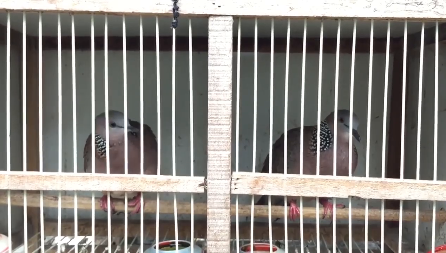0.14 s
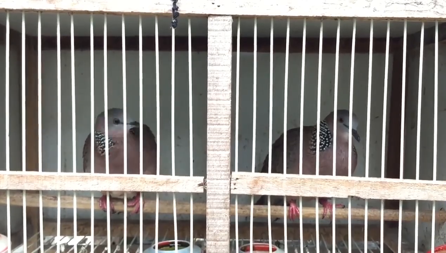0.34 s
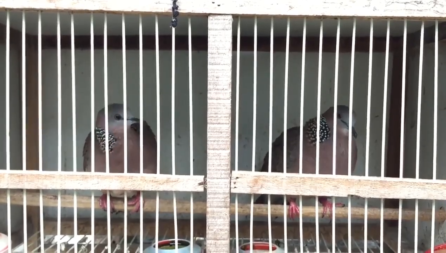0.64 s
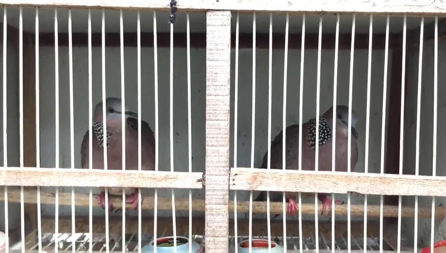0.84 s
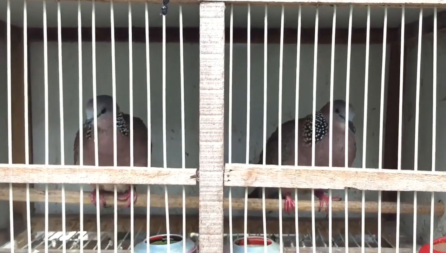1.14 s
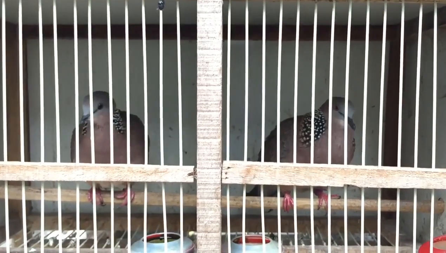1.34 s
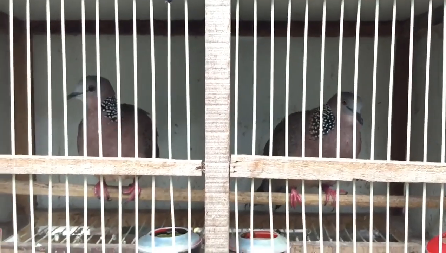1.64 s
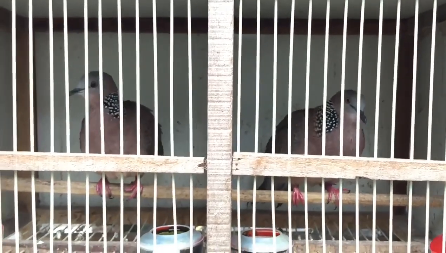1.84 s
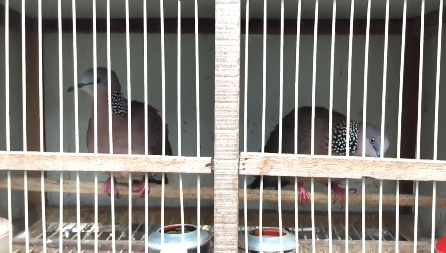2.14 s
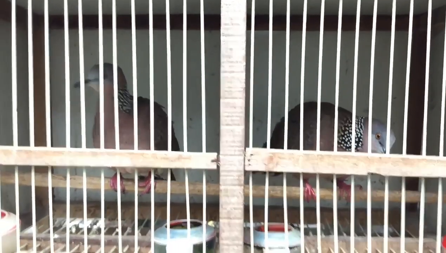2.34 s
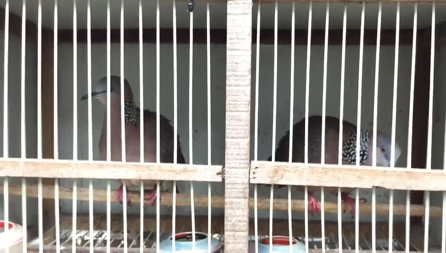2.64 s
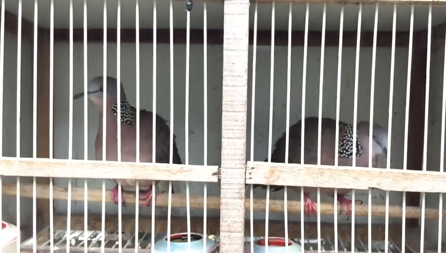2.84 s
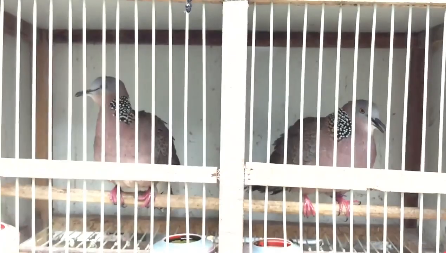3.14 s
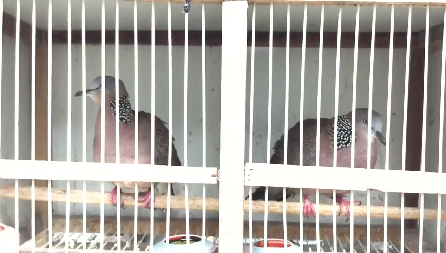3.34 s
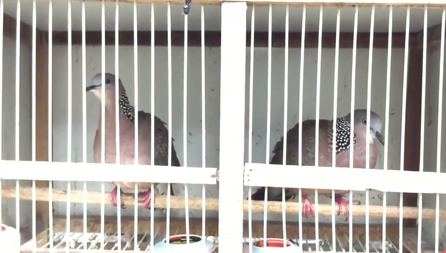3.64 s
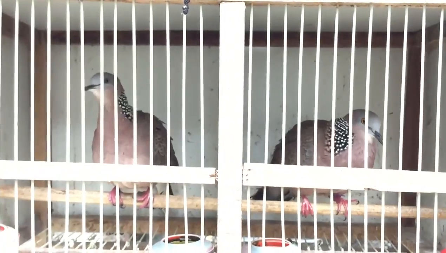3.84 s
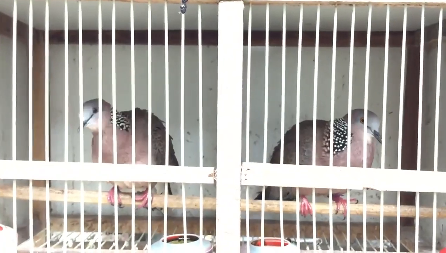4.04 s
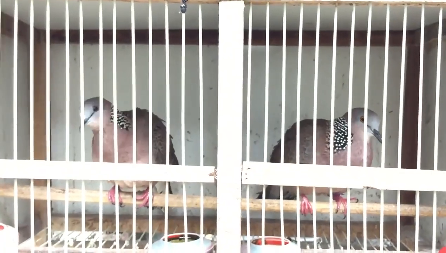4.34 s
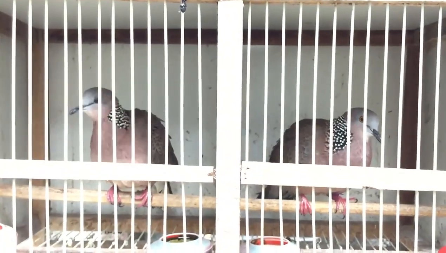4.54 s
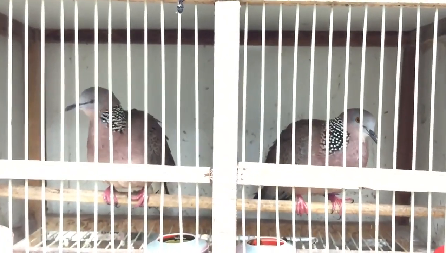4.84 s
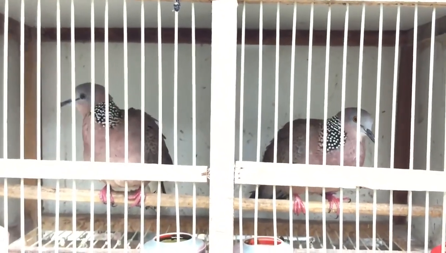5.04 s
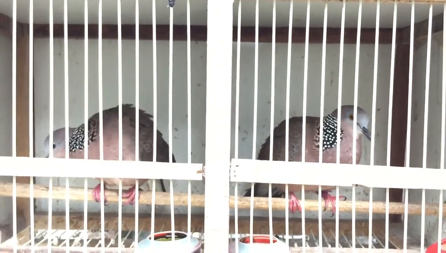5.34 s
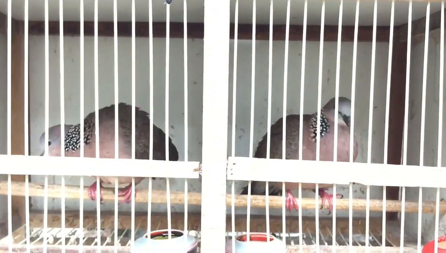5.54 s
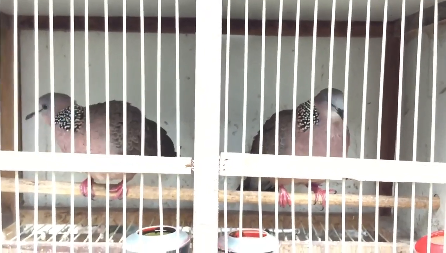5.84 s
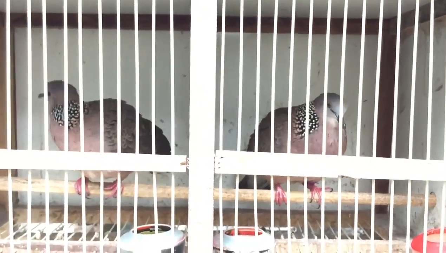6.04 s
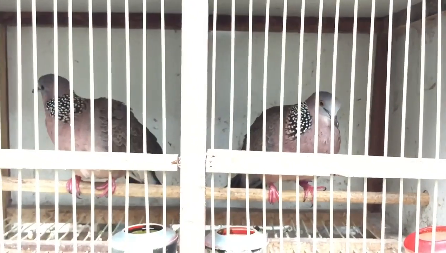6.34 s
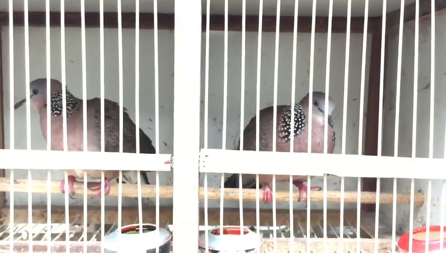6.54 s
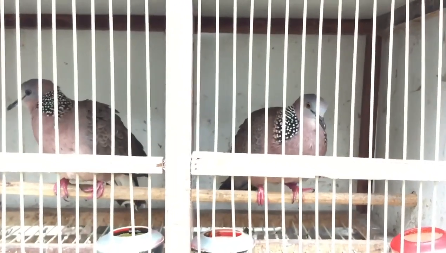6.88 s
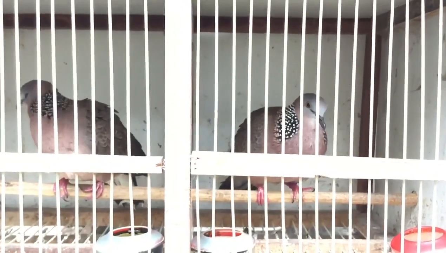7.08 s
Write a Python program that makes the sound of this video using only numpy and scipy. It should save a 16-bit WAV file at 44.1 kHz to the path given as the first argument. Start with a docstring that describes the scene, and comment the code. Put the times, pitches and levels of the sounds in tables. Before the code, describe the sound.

Caged doves coo over one another: one clear and near, repeating hoot-hoot-purr, others fluttery and echoing, with faint claw ticks and distant traffic.

```python
"""A near spotted dove repeats two short hoots and a long purr: near-pure arched tones, chopped by its syrinx.
Neighbours in wooden cages coo more roughly around it, and a low-voiced dove draws its coos out and grunts.
Claws tick and knock on the perches as impulses and ringing modes; feathers rustle as coloured noise.
Far off are traffic, hiss and a whine of shaped noise, a motorbike of exhaust pulses, hoarse squawks,
whistles, chips and held notes. Decaying noise stands for the reflections of the yard."""
import sys
import numpy as np
from scipy import signal
from scipy.fft import rfft, irfft, next_fast_len
from scipy.io import wavfile
from scipy.ndimage import map_coordinates

SR = 44100
rng = np.random.default_rng(int(sys.argv[2]) if len(sys.argv) > 2 else 0)


def waveform_to_disk(signal):
    """Save audio, clipped to [-1, 1], as 16-bit WAV at the path in sys.argv[1]."""
    frames = np.transpose(np.atleast_2d(signal))
    scaled = np.clip(frames, -1, 1) * 32767
    samples = np.round(scaled).astype(np.int16)
    wavfile.write(sys.argv[1], SR, samples)


N = 317961
TIME = np.arange(N) / SR

# Relative spectra of traffic, far hiss, far whine, feathers and still air. Each row: frequency in Hz, level in dB.
TRAFFIC_SPECTRUM = [(38, -13), (52, -8), (70, 3), (105, -0.5), (130, -7), (170, -13), (260, -17),
                    (420, -15)]
HISS_SPECTRUM = [(590, -34.5), (1000, -1), (1370, -8.5), (1510, -10.5), (1630, -8), (2480, -12.5),
                 (5000, -25.5), (6500, -58.5), (11000, -120)]
WHINE_SPECTRUM = [(1150, -14.5), (1330, -2.5), (1410, -1), (1520, -3), (1650, -9), (1830, -1.5),
                  (2250, -8.5), (2550, -18), (3200, -30)]
FEATHER_SPECTRUM = [(1760, -26.5), (3000, -9.5), (3240, -4.5), (3870, -4.5), (4290, -7), (4960, -5.5),
                    (5500, 1.5), (7050, -6), (9160, -3.5), (10400, -7.5), (13100, -5), (15600, -24.5)]
AIR_SPECTRUM = [(200, -9.5), (450, -19), (1000, 6.5), (2000, -16), (4000, -26), (6000, -29), (9000, -23.5),
                (15500, -27)]
# Swells of traffic rumble, gusts of far hiss, rustles of feathers. Each row: start in seconds, length in seconds,
# level in dB.
RUMBLES = [(-.1, 0.29, -40), (1.2, 3.06, -43.5), (5.1, 0.35, -47), (6.92, 0.2, -38.5)]
HISS_GUSTS = [(.135, 0.12, -60), (.31, 0.19, -66)]
RUSTLES = [(.2, 0.42, -61.5), (.58, 0.17, -60), (.72, 0.097, -56.5), (1.04, 0.098, -66),
           (1.27, 0.072, -59.5), (1.56, 0.086, -66), (1.88, 0.11, -58), (2.73, 0.13, -59.5),
           (3.87, 0.12, -56.5), (4.02, 0.06, -62), (4.39, 0.085, -54.5), (4.5, 0.38, -62), (5.22, .11, -57),
           (5.43, 0.39, -61), (6.03, 0.062, -59), (6.24, 0.13, -59.5), (6.61, 0.24, -55), (7.1, 0.36, -58)]
# Far sounds that swell and fade. Each: loudest moment in seconds, level there in dB, rise in dB per second,
# fall in dB per second.
BIKE_PASS = (0.45, -39, 23, 16)
HISS_PASS = (0.33, -51, 13, 18.5)
WHINE_PASS = (7, -45.5, 24, 61)
BIKE_TOP_HZ, BIKE_IDLE_HZ, BIKE_REV_HZ_PER_S = 36.23, 30.43, 9  # firing rate, highest when it is loudest

# Whistles of small birds, held notes of a far animal, squawks of a far bird. Each row: start in seconds,
# length in seconds, first, middle and last pitch in Hz, level in dB.
WHISTLES = [(.078, 0.013, 5360, 5540, 5700, -54), (.35, 0.045, 5650, 5530, 5340, -57),
            (1.92, 0.06, 3880, 3840, 3950, -66.5), (2.65, 0.064, 3500, 3640, 3470, -64.5),
            (3.06, 0.18, 3310, 3750, 4130, -75.5), (3.34, 0.089, 4070, 4130, 4130, -76),
            (5.86, 0.032, 5420, 5450, 5430, -64.5)]
FAR_NOTES = [(-.04, 0.24, 1500, 1476, 1440, -57), (-.04, 0.81, 1235, 1245, 1205, -64),
             (6.85, 0.14, 1373, 1423, 1380, -52), (7.12, 0.11, 1370, 1418, 1376, -48.5)]
SQUAWKS = [(4.76, 0.18, 688, 665, 678, -53.5), (4.954, 0.16, 623.4, 672.6, 634.5, -53),
           (5.115, 0.149, 619, 631.4, 611, -58.5)]
# Relative spectrum of the squawks. Each row: frequency in Hz, level in dB.
SQUAWK_SPECTRUM = [(600, -31), (1300, 2.5), (1700, -7), (2000, -6), (2550, 4), (3300, 1), (4050, 0.5),
                   (4700, -13), (9000, -23)]
SQUAWK_RASP_DB = -9  # hoarse noise in each squawk
# Hoarse chips of small birds. Each row: start in seconds, length in seconds, centre in Hz, level in dB.
CHIPS = [(1.864, 0.074, 4820, -57.5), (3.895, 0.046, 5400, -59), (4.012, 0.053, 6770, -56),
         (6.252, 0.07, 5650, -59)]

# Claw and beak ticks. Each row: start in seconds, relative level in dB, relative weight below 4000 Hz in dB.
TICKS = [(0.15, -47, -3), (1.577, -52, 13), (2.6253, -45.5, -19), (3.501, -43, -19), (4.031, -47, -60),
         (4.8702, -35.5, 53)]
# Relative spectrum of a tick before that weight. Each row: frequency in Hz, level in dB.
TICK_SPECTRUM = [(1000, -25), (2500, 4), (4200, -3), (5600, 3.5), (7200, 1.5), (10000, -2.5), (15000, -7)]
# Feet landing on the perch. Each row: start in seconds, relative level in dB, hardness in dB (upper modes, scrape).
KNOCKS = [(2.4199, -31.5, 4.5), (2.727, -33.5, -19.5), (2.761, -36.5, -19.5), (3.312, -46.5, 6)]
# Modes of the wooden perch. Each row: frequency in Hz, relative level in dB, time to decay by 60 dB in seconds.
PERCH_MODES = [(193, 1, 0.061), (244, 7, 0.037), (300, 3.5, 0.039), (1310, 14.5, 0.0048),
               (1565, -17.5, 0.12), (1820, -17.5, 0.1), (2940, -17, 0.031)]

# Coos of the neighbours. Each row: start in seconds, length in seconds, pitch after the opening climb and
# last pitch in Hz, level in dB, flutter depth (limited to 1).
NEIGHBOUR_COOS = [ (-.05, 0.44, 623.2, 600.8, -30, .5), (0.223, .14, 683, 640, -32, 0.5),
                  (.469, 0.24, 640.4, 616.5, -25.5, .8), (0.745, .28, 657.3, 640, -31.5, .8),
                  (1.441, 0.21, 722.6, 690, -25, 0.8), (1.695, 0.32, 740.4, 690, -24, .9),
                  (2.024, 0.055, 681.7, 642, -18, 0.4), (2.089, 0.089, 634, 579, -26, .7),
                  (2.09, 0.15, 790, 761, -38.5, 0.7), (2.364, 0.41, 895, 844, -33.5, 1),
                  (2.624, 0.1, 690, 681, -31.5, 0.8), (2.787, 0.26, 692, 646, -31, 1.2),
                  (3.056, .11, 675, 597, -26, 0.15), (3.138, 0.13, 561.4, 585, -29, .7),
                  (3.196, 0.12, 735, 740, -28, 0.9), (3.344, 0.24, 630, 605.4, -32, 0.5),
                  (3.651, 0.44, 622, 557.4, -34.5, 0.5), (4.027, .17, 680, 676.5, -26.5, .6),
                  (4.201, 0.13, 646, 558.6, -28.5, .45), (4.353, 0.19, 647, 639, -49.5, 0.37),
                  (4.544, 0.2, 633, 596, -39, .25), (4.716, 0.12, 690, 642, -26.5, 1.1),
                  (4.948, 0.41, 690, 661, -30.5, .7), (5.297, 0.091, 799.4, 768, -30.5, .9),
                  (5.395, 0.3, 700.4, 702, -30.5, 1), (5.506, 0.31, 840, 838.5, -33, 0.7),
                  (5.625, 0.056, 737.5, 703, -19, 0.5), (5.778, 0.21, 674.2, 660.5, -24, 0.7),
                  (5.989, 0.25, 700.7, 658.3, -27, .45), (6.496, 0.2, 684.4, 649.6, -32, .8),
                  (6.76, .17, 628, 584.4, -29, 0.7), (6.934, 0.32, 650, 618, -40.5, 0.3)]
# The higher a neighbour's coo, the faster it flutters.
FLUTTER_AT_HZ, NEIGHBOUR_FLUTTER_HZ, FLUTTER_POWER = 690, 63.51, 2.0

# Coos of the low-voiced dove. Each row: start in seconds, length in seconds, level in dB.
LOW_COOS = [(-.1, 0.85, -33.5), (2.227, 0.75, -29.5), (4.921, .9, -29.5)]
# Grunts between and after those coos. Each row: start in seconds, length in seconds, first pitch in Hz,
# level in dB.
GRUNTS = [(1.43, 0.094, 500.7, -38), (4.2, 0.064, 507, -35.5), (4.5, 0.11, 550.4, -33),
          (6.74, 0.054, 490, -38), (6.87, 0.16, 543, -37.5)]
LOW_ARCH_HZ, LOW_TOP_PLACE = (548, 594, 536), .48  # first, top and last pitch; share of the coo at the top
LOW_FLUTTER, LOW_CLEAN_PLACE = .72, .55  # depth at first; the flutter fades around this share of the coo
# Before and after each coo the voice breaks into a lower register; levels relative to the coo.
LOW_REGISTER_HZ, LEAD_IN_S, LEAD_IN_DB = 494.3, 0.24, -5.5
DROP_S, DROP_DB, DROP_SAG_HZ_PER_S, DROP_FADE_DB_PER_S = 0.11, -0.5, 250, 92

# Phrases of the near dove. Each row: start in seconds, second hoot's length in seconds, delay of the purr in
# seconds, its length in seconds, its top pitch in Hz, place of that top (0-1), nominal flutter rate in Hz,
# fluttering share of each note (0-1).
PHRASES = [(.678, .104, .333, .454, 797, .35, 77, .7), (3.282, .096, .305, .468, 808, .28, 84, .64),
           (5.905, .086, .310, .464, 800, .36, 79, .67)]
# Resonances of throat and beak that light up overtones. Each row: multiple of the pitch, resonance in Hz,
# width in Hz, level in dB.
OVERTONES = [(2, 1330, 280, -54), (3, 2080, 260, -70), (4, 2980, 300, -70), (8, 6230, 480, -67),
             (12, 9100, 550, -73)]
# Relative passband of the inflated throat. Each row: frequency in Hz, level in dB.
THROAT_PASSBAND = [(330, -22), (430, -4), (520, 0), (830, 0), (920, -5), (1050, -12), (1250, -4), (1420, 1),
                   (1600, -6), (2100, 0), (12000, 0)]
# Both hoots arch up from one pitch, the second one higher and later in the note.
FIRST_HOOT_S, HOOT_SPACING_S, HOOT_FLUTTER = .081, .146, .1
HOOT_START_HZ, HOOT_TOPS_HZ, HOOT_TOP_PLACES = 545, (748, 793), (.45, .56)
PURR_START_HZ, PURR_FLUTTER, END_HZ = 765, .92, 605  # each arch of the near dove sinks to END_HZ
NEAR_DB, TIRING_DB_PER_S, NEAR_ATTACK_S = -14.5, 2, .015
SCOOP_HZ, SCOOP_S = 120, .017  # the purr slides up into its pitch and curls down at the end
FLUTTER_LAG, FLUTTER_SETTLE_S = .2, .07  # the flutter starts slower by this share of its nominal rate
OVERTONE_WAVER_DB = 3.5
FLUTTER_TUG_RAD = .15  # at full depth, how far each closure of the valve tugs the phase
SLIP_SHARE = .75  # share of closures that cost a cycle in a deep flutter

# Reflections from cages and walls.
NEAR_WET_DB, NEAR_T60_S, FAR_WET_DB, FAR_T60_S = -11, 0.47, -2, 0.66
LOW_WET_DB = -6.5
TOP_HZ = 15550


def undb(db):
    """A level in decibels is the logarithm of an amplitude gain."""
    return 10 ** (np.asarray(db) / 20)


def unit(x):
    """Normalisation by the effective value gives rms 1."""
    return x / np.sqrt(np.mean(x ** 2))


def ramp(x):
    """A squared sine steps smoothly from 0 to 1."""
    return np.sin(np.pi / 2 * np.clip(x, 0, 1)) ** 2


def drift(rate, size):
    """Spline-interpolated random values, `rate` a second, make a smooth fluctuation with spread near 1."""
    coarse = np.arange(0, size + 32, 32)
    values = map_coordinates(rng.standard_normal(2048), [coarse * rate / SR], order=3, mode="wrap")
    return np.interp(np.arange(size), coarse, values)


def colour(x, points):
    """Linear filtering multiplies the spectrum by a (Hz, dB) curve that falls away beyond its ends."""
    hz, db = np.transpose(points)
    size = next_fast_len(len(x))
    f = np.maximum(np.arange(size // 2 + 1) * SR / size, 1)
    ends = 1 / np.sqrt((1 + (hz[0] / f / 1.2) ** 8) * (1 + (f / hz[-1] / 1.2) ** 8))
    gain = undb(np.interp(np.log(f), np.log(hz), db))
    return irfft(rfft(x, size) * ends * gain, size)[:len(x)]


def add(out, start, x):
    """Superposition: sounds add sample by sample from a start in seconds."""
    i = int(start * SR)
    x, i = x[max(-i, 0):], max(i, 0)
    out[i:i + len(x)] += x[:N - i]


def yard(x, wet_db, t60):
    """Reverberation: direct sound plus exponentially decaying noise for reflections from cages and walls."""
    t = np.arange(SR // 2) / SR
    tail = rng.standard_normal(len(t)) * np.exp(-np.log(1000) * t / t60) * ramp(t / 0.0028)
    tail = tail / np.linalg.norm(tail)
    return x + undb(wet_db) * signal.fftconvolve(x, tail)[:N]


def passing(peak_s, db, rise_db_per_s, fall_db_per_s):
    """The level of a far sound grows linearly in dB to a peak and falls again."""
    return undb(db - np.maximum(rise_db_per_s * (peak_s - TIME), fall_db_per_s * (TIME - peak_s)))


def bursts(rows, attack_share):
    """An envelope of bursts: each rises for a share of its length and ebbs for the rest."""
    share = np.clip(attack_share, .05, .95)
    gain = np.zeros(N)
    for start, length, db in rows:
        rise = ramp((TIME - start) / length / share)
        ebb = ramp((start + length - TIME) / length / (1 - share))
        gain += undb(db) * rise * ebb
    return gain


def patchy(x, patchy_db, rate, count):
    """Independent modulation: `count` frequency bands of a sound flicker each on its own."""
    size = next_fast_len(N)
    spectrum, edges = rfft(x, size), np.geomspace(900, 16000, count + 1)
    band = np.digitize(np.arange(len(spectrum)) * SR / size, edges[1:-1])
    total = np.zeros(N)
    for k in range(count):
        total += irfft(spectrum * (band == k), size)[:N] * undb(patchy_db * drift(rate, N))
    return unit(total)


def wash(spectrum, flicker_db, flicker_rate):
    """Filtered random noise of wavering level, normalised to rms 1."""
    return unit(colour(rng.standard_normal(N), spectrum) * undb(flicker_db * drift(flicker_rate, N)))


def still_air(air_db=-61):
    """Steady broadband noise forms the background of still air."""
    return wash(AIR_SPECTRUM, 1.0, 51) * undb(air_db)


def traffic(traffic_db=-45):
    """Low-frequency noise rumbles on; its swells add to the floor in power."""
    return wash(TRAFFIC_SPECTRUM, 1.4, 9) * np.hypot(undb(traffic_db), bursts(RUMBLES, attack_share=.3))


def far_hiss(hiss_db=-65):
    """Noise flickering band by band hisses far off, with a swell and gusts over a floor."""
    hiss = patchy(wash(HISS_SPECTRUM, 2.2, 12), patchy_db=4, rate=10, count=60)
    swells = passing(*HISS_PASS) + bursts(HISS_GUSTS, attack_share=.25)
    return hiss * np.hypot(undb(hiss_db), swells)


def far_whine():
    """Noise concentrated in a midrange band is heard as a hoarse whine."""
    return patchy(wash(WHINE_SPECTRUM, 0.9, 18), patchy_db=3.5, rate=22, count=60) * passing(*WHINE_PASS)


def feathers(stir_db=-69):
    """Friction noise: feathers stir faintly throughout and rustle in bursts."""
    friction = patchy(wash(FEATHER_SPECTRUM, 2.0, 190), patchy_db=1.5, rate=17, count=30)
    return friction * np.hypot(undb(stir_db + 3.5 * drift(11, N)), bursts(RUSTLES, attack_share=.25))


def motorbike(scatter_db=3.0):
    """A train of exhaust pulses, smeared by reflections, keeps only its low harmonics."""
    hz = np.maximum(BIKE_TOP_HZ - BIKE_REV_HZ_PER_S * np.abs(TIME - BIKE_PASS[0]), BIKE_IDLE_HZ)
    pulses = np.diff(np.floor(np.cumsum(hz) / SR), prepend=0) * undb(scatter_db * drift(42, N))
    smeared = yard(pulses, wet_db=15, t60=.6)
    low = colour(smeared, [(100, -15.5), (165, 1.5), (240, -8.5), (350, -7.0), (450, -18.0)])
    return unit(low) * passing(*BIKE_PASS)


def far_birds(notes, timbre, rough, count, waver_db):
    """Harmonic synthesis: `count` harmonics follow a parabolic pitch with random unsteadiness."""
    out = np.zeros(N)
    for start, length, first, middle, last, db in notes:
        u = np.linspace(0, 1, int(length * SR))
        hz = np.polyval(np.polyfit([0, .5, 1], [first, middle, last], 2), u)
        phase = 2 * np.pi * np.cumsum(hz * (1 + rough * drift(250, len(u)))) / SR
        harmonics = sum(np.sin(k * phase) for k in range(1, count + 1))
        envelope = undb(db + waver_db * drift(62, len(u))) * ramp(4 * u) * ramp(4 * (1 - u))
        add(out, start, unit(colour(harmonics, timbre)) * envelope)
    return out


def squawks():
    """Hoarseness: harmonics that flicker band by band sound over noise of the same spectrum."""
    voice = far_birds(SQUAWKS, SQUAWK_SPECTRUM, rough=.012, count=8, waver_db=2.5)
    rows = [(start, length, db) for start, length, *_, db in SQUAWKS]
    rasp = wash(SQUAWK_SPECTRUM, 2, 40) * bursts(rows, attack_share=0.22)
    broken = np.std(voice) * patchy(voice, patchy_db=3, rate=18, count=14)
    return broken + undb(SQUAWK_RASP_DB) * rasp


def chips():
    """Narrow-band noise has no definite tone: each chip of a small bird is a short band of hiss."""
    out = np.zeros(N)
    for start, length, hz, db in CHIPS:
        band = wash([(.8 * hz, -22), (hz, 0), (1.4 * hz, -20)], 3, 150)
        out += band * bursts([(start, length, db)], attack_share=.3)
    return out


def ticks(decay_s=0.01, gain_db=-3, body=0.24):
    """Impact: claws and beaks excite broadband cracks that decay exponentially, some with more body."""
    out, t = np.zeros(N), np.arange(4096) / SR
    for start, db, middle_db in TICKS:
        spectrum = [(hz, d + body * middle_db * (hz < 4000)) for hz, d in TICK_SPECTRUM]
        crack = unit(colour(rng.standard_normal(len(t)), spectrum))
        add(out, start, crack * np.exp(-t / decay_s) * undb(db + gain_db))
    return out


def knocks(scrape_db=-24, scrape_s=0.072):
    """Modal ringing: feet strike the perch; hardness sets its modes above 1000 Hz and a scrape."""
    out, t = np.zeros(N), np.arange(16384) / SR
    for start, db, hard_db in KNOCKS:
        ring = np.zeros(len(t))
        for hz, d, t60 in PERCH_MODES:
            ring += undb(d + hard_db * (hz > 1000) - 60 * t / t60) * np.sin(2 * np.pi * hz * t)
        scrape = unit(colour(rng.standard_normal(len(t)), HISS_SPECTRUM))
        scrape = scrape * np.exp(-t / scrape_s) * undb(scrape_db + hard_db)
        add(out, start, undb(db) * (ring + scrape) * ramp(t / 0.00061))
    return out


def arch(u, first, turn, last, place):
    """Pitch follows pressure: over a note (u 0-1) it climbs to the turn, then bends to the last pitch."""
    place = np.clip(place, .05, .95)
    climb = (first - turn) * np.maximum(1 - u / place, 0) ** 1.9
    bend = (last - turn) * np.maximum((u - place) / (1 - place), 0) ** 2.3
    return turn + climb + bend


def syrinx(hz, flutter_hz, depth, uneven, scatter):
    """Modulation by a fluttering valve: closures chop a tone and tug its phase; firm ones may cost a cycle."""
    size = len(hz)
    cycle = np.cumsum(flutter_hz * (1 + uneven * drift(70, size))) / SR
    closure = np.cos(np.pi * cycle) ** 2
    shut = np.clip(depth * (1 + .2 * drift(70, size)), 0, 1) * closure ** 1.8
    # one random number per closure decides whether it is firm
    chance = rng.random(256)[np.round(cycle).astype(int) % 256]
    firm = chance < SLIP_SHARE * ramp((depth - .35) / .35)
    # closure ** 3 averages 5/16, so a firm closure slips one whole cycle
    slip = 2 * np.pi * np.cumsum(firm * closure ** 3 * np.gradient(cycle)) * 16 / 5
    phase = 2 * np.pi * np.cumsum(hz) / SR
    tug = FLUTTER_TUG_RAD * depth * np.sin(2 * np.pi * cycle)
    wander = scatter * depth ** 2 * drift(1.4 * np.mean(flutter_hz), size)
    tone = np.sin(phase + tug - slip + wander)
    # the membranes also rasp irregularly a little below the pitch
    rasp = .2 * depth * drift(190, size) * np.sin(.91 * phase)
    return np.sqrt(2) * ((1 - shut) * (1 + .13 * depth * drift(70, size)) * tone + rasp)


def swell(t, hz, attack_s, release_s, fade_db):
    """Loudness follows pitch: the note has soft ends and is weaker where it is low."""
    return ramp(t / attack_s) * ramp((t[-1] - t) / release_s) * undb(-fade_db * (1 - hz / hz.max()))


def neighbours(first=0.94, place=0.21, fade_db=10):
    """Uneven valve modulation makes rougher coos in the other cages, each with a soft release."""
    out, tail_s = np.zeros(N), .025
    for start, length, turn, last, db, depth in NEIGHBOUR_COOS:
        t = np.arange(int((length + tail_s) * SR)) / SR
        hz = arch(t / (length + tail_s / 2), first * turn, turn, last, place)
        flutter_hz = NEIGHBOUR_FLUTTER_HZ * (turn / FLUTTER_AT_HZ) ** FLUTTER_POWER
        voice = syrinx(hz, flutter_hz, min(depth, 1), uneven=.22, scatter=1.1)
        add(out, start, voice * swell(t, hz, tail_s, 2 * tail_s, fade_db) * undb(db))
    return out


def low_dove(flutter_hz=48, lead_flutter=.55, drop_flutter=0.16, grunt_flutter=0.48, grunt_sag_hz_per_s=170):
    """Register breaks: purring coos jump up from a lower pitch and drop back; grunts come between and after."""
    out = np.zeros(N)

    def sing(start, t, hz, db, depth):
        """The valve modulates one pitch track between smooth edges."""
        edges = ramp(t / .012) * ramp((t[-1] - t) / .02)
        voice = syrinx(hz, flutter_hz, depth, uneven=.25, scatter=1.2)
        add(out, start, edges * undb(db) * voice)

    lead, drop = np.arange(0, LEAD_IN_S, 1 / SR), np.arange(0, DROP_S, 1 / SR)
    lead_hz = np.full(len(lead), LOW_REGISTER_HZ)
    drop_hz = LOW_REGISTER_HZ - DROP_SAG_HZ_PER_S * drop
    for start, length, db in LOW_COOS:
        t = np.arange(0, length, 1 / SR)
        coo_hz = arch(t / length, *LOW_ARCH_HZ, LOW_TOP_PLACE)
        purr = LOW_FLUTTER * (1 - .95 * ramp((t / length - LOW_CLEAN_PLACE) / .2 + .5))
        drop_level = db + DROP_DB - DROP_FADE_DB_PER_S * drop
        sing(start - LEAD_IN_S, lead, lead_hz, db + LEAD_IN_DB, lead_flutter)
        sing(start, t, coo_hz, db, purr)
        sing(start + length, drop, drop_hz, drop_level, drop_flutter)
    for start, length, hz, db in GRUNTS:
        t = np.arange(0, length, 1 / SR)
        sing(start, t, hz - grunt_sag_hz_per_s * t, db, grunt_flutter)
    return out


def overtones(t, hz):
    """Resonance: thin overtones light up as they glide through it, and grow as the note is pushed on."""
    phase = 2 * np.pi * np.cumsum(hz) / SR
    push = ramp(t / .45 + .12) * ramp(t / .015) * ramp((t[-1] - t) / .01)
    total = np.zeros(len(t))
    for k, centre, width, db in OVERTONES:
        resonance = 1 / (1 + (2 * (k * hz - centre) / width) ** 2)
        total += undb(db + OVERTONE_WAVER_DB * drift(25, len(t))) * np.sin(k * phase) * resonance
    return push * np.sqrt(2) * total


def near_dove(fade_db=12):
    """Valve modulation of arched tones: the flutter quickens early, eases, and stops before a clean fall."""
    out, thin = np.zeros(N), np.zeros(N)

    def coo(start, length, first, top, place, depth, flutter_hz, share, scoop_hz=0):
        """One note joins the chopped tone with its continuous overtones."""
        t = np.arange(int(length * SR)) / SR
        u = t / length
        scoop = np.exp(-t / SCOOP_S) + .5 * np.exp((t - length) / SCOOP_S)
        hz = arch(u, first, top, END_HZ, place) - scoop_hz * scoop
        flutter = flutter_hz * (1.04 - FLUTTER_LAG * np.exp(-t / FLUTTER_SETTLE_S))
        purr = depth * (1.08 - .3 * u) * ramp((share - u) / .2 + .5)
        voice = syrinx(hz, flutter, purr, uneven=.07, scatter=.6)
        voice = voice * swell(t, hz, NEAR_ATTACK_S, .004 + .13 * length, fade_db)
        add(out, start, voice * undb(NEAR_DB - TIRING_DB_PER_S * t))
        add(thin, start, overtones(t, hz))

    for start, second_s, purr_after, purr_s, purr_top, purr_place, flutter_hz, share in PHRASES:
        for k, length in enumerate((FIRST_HOOT_S, second_s)):
            coo(start + k * HOOT_SPACING_S, length, HOOT_START_HZ, HOOT_TOPS_HZ[k], HOOT_TOP_PLACES[k],
                HOOT_FLUTTER, flutter_hz, share)
        coo(start + purr_after, purr_s, PURR_START_HZ, purr_top, purr_place,
            PURR_FLUTTER, flutter_hz, share, SCOOP_HZ)
    return colour(out, THROAT_PASSBAND) + thin


def scene():
    """The ratio of direct to reflected sound gives distance: the near dove is almost dry, others are wetter."""
    surroundings = still_air() + traffic() + far_hiss() + far_whine() + feathers()
    whistles = far_birds(WHISTLES, [(2500, 0), (7000, 0)], rough=.008, count=1, waver_db=3)
    notes = far_birds(FAR_NOTES, [(1000, 0), (2000, 0)], rough=.018, count=1, waver_db=2.5)
    further = yard(colour(neighbours(), THROAT_PASSBAND) + whistles + notes, FAR_WET_DB, FAR_T60_S)
    cages = yard(colour(low_dove(), THROAT_PASSBAND) + ticks() + chips() + squawks(), LOW_WET_DB, NEAR_T60_S)
    dove = yard(near_dove() + knocks(), NEAR_WET_DB, NEAR_T60_S)
    return (dove + cages + further + motorbike() + surroundings)[None]


def record(dry):
    """Band limiting: the recorder thins the deep bass and cuts the top steeply."""
    thinned = signal.sosfilt(signal.butter(3, 42, "high", fs=SR, output="sos"), dry)
    return signal.sosfilt(signal.ellip(10, .2, 80, TOP_HZ, fs=SR, output="sos"), thinned)


dry = scene()
out = record(dry)
waveform_to_disk(out)
```